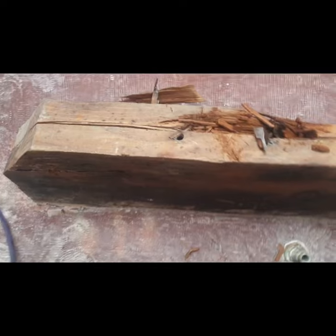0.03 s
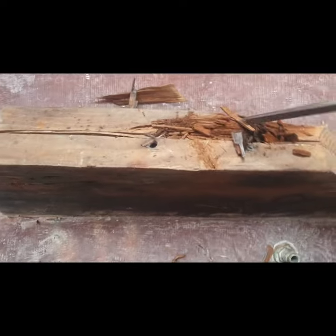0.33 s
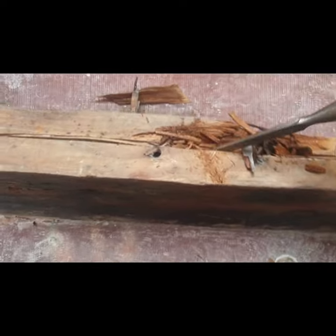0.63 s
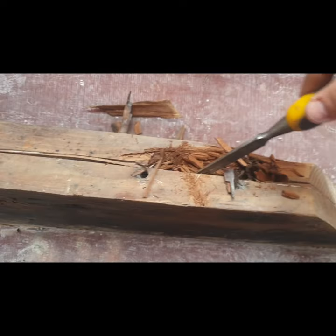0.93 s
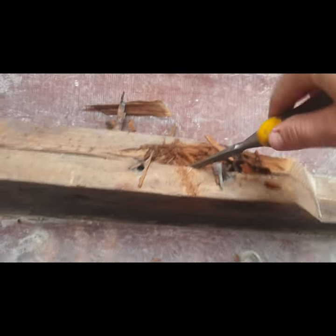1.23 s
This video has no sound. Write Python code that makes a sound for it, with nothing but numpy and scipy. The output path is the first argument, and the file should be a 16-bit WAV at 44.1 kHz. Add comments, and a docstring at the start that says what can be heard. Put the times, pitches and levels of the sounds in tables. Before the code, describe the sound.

Close to the microphone in a quiet small room, a chisel levers at decayed wood with light ticks, crumbly scrapes and occasional knocks. The crackling grows into a loud crack and a low workbench thud, then eases to faint scraping.

```python
"""Chisel in a rotten beam

A steel chisel picks and levers at a beam on a workbench, close to the microphone and a little to the
right, in a small room. Crumbling fibres rustle under the blade, dry splinters snap, the steel squeaks,
and the beam knocks on the booming bench. A run of sharp snaps ends in one loud break."""
import sys
import numpy as np
from scipy import signal
from scipy.fft import rfft, irfft, next_fast_len
from scipy.io import wavfile

SR = 44100
rng = np.random.default_rng(int(sys.argv[2]) if len(sys.argv) > 2 else 0)


def wav_record(signal):
    """Record a signal, one row per channel, as 16-bit PCM in the file named by sys.argv[1]."""
    frames = np.transpose(np.atleast_2d(signal))
    bounded = np.clip(frames, -1, 1)
    # unit amplitude maps onto the largest positive 16-bit level
    quanta = np.round(bounded * 32767).astype(np.int16)
    wavfile.write(sys.argv[1], SR, quanta)


N = 4 * SR
HIT_TIME = np.arange(SR * 3 // 5) / SR  # seconds into one hit
HIT_N = len(HIT_TIME)

# Splinters snapping: start_s, level_db, woody_db, top_db, left_minus_right_db
SPLINTERS = [(0.7325, -56, -6, -22, -9.5), (0.8705, -64, -11, -8, -9), (1.1425, -61.5, -2, -22, -5),
             (1.3004, -49, -2, -11, -4), (0.9259, -42, -3, -15.5, -8.5), (1.0138, -49, -2.5, -20, -7.5),
             (1.0557, -54, -15, -9, -6), (1.266, -46, -12, -10.5, -11.5), (1.3181, -41.5, 4, -6, -0.5),
             (1.3292, -27, -30, -13, -6), (1.3403, -37.5, 5, -13, -1), (1.476, -38.5, -7.5, -11, -3.5),
             (1.51, -39, -5.5, -14, -5), (1.5514, -46.5, -4, -11, 0), (1.5988, -34.5, -4.5, -15.5, -5.5),
             (1.6047, -35, 0, -24, -4), (1.7963, -36, -9, -11.5, -3), (1.8139, -32.5, -2.5, -15, -2),
             (1.9674, -26.5, -3, -15.5, -5), (2.1675, -45.5, -10, -2, -9.5), (2.1799, -32, -5, -28, 0),
             (2.5047, -42.5, -4.5, -11, -8), (2.6569, -40.5, -3.5, -7, -9), (2.7458, -41, -4, -13, -7),
             (2.819, -32.5, -10.5, -16, -5), (2.9438, -24.5, -7, -7, -7), (3.0053, -24.5, -11.5, -9, -2),
             (3.0415, -29.5, -8.5, -4, -2), (3.0782, -23, -1.5, -4, -4), (3.1487, -30, -17.5, -9.5, -6),
             (3.1643, -17, -10, -8.5, -3.5), (3.2299, -14.5, 1.5, -2, -4.5),
             (3.3491, -27.5, -5.5, -15.5, -5.5), (3.5106, -51, 0, 2, -1.5), (3.8497, -42, -8, -13, 0)]
# The woody, cracking and top bands of a snap: frequency_hz, gain_db
WOODY_BAND = [(100, -22), (310, -4), (520, -11.5), (820, -2), (1020, -9), (1420, 2), (1900, -5), (2400, -3),
              (3300, -10.5), (7000, -49.5)]
CRACK_BAND = [(1200, -37.5), (2700, -2.5), (4200, -0.5), (5800, -6), (7300, -5), (8600, -20.5),
              (12000, -31)]
TOP_BAND = [(5000, -38.5), (8300, -4), (10500, 0.5), (12000, -2.5), (14300, -1), (16000, -13.5)]
# Beam knocking on the bench: start_s, clack_db, hollow_db, boom_db, body_db, edge_hz, damping_factor
BEAM_KNOCKS = [(0.145, -80, -78, -59, -60.5, 1000, 1.14), (0.5, -86, -85, -67, -69, 800, 0.97),
               (0.7314, -40.5, -44.5, -40, -45, 1470, 0.92), (0.871, -64, -68, -64, -70, 1500, 0.91),
               (1.329, -30.5, -40.5, -44.5, -46, 3000, 0.88), (1.526, -50, -57, -48, -56.5, 2400, 0.75),
               (1.607, -34, -49.5, -41, -45, 2400, 1.34), (1.77, -16, -38, -30, -42, 2000, 0.99),
               (1.814, -42, -50, -41, -42, 2400, 1.37), (2.179, -35, -51, -37.5, -41, 2200, 1.1),
               (2.227, -46, -64, -36, -41.5, 1600, 1.45), (2.266, -44, -62, -33, -43, 1600, 2.04),
               (2.295, -63, -73, -40, -44, 1200, 2.6), (2.495, -41, -65, -40, -60.5, 1800, 1.34),
               (2.771, -43, -52, -34, -48.5, 1600, 1.34), (2.821, -36, -58, -35, -43.5, 2200, 1.75),
               (3.077, -21.5, -46, -58, -40.5, 2900, 1.2), (3.23, -8, -31.5, -27, -39, 2800, 1.3),
               (3.236, -6, -28, -15.5, -25, 2600, 1.33), (3.259, -17, -32.5, -19.5, -19, 2600, 1.94),
               (3.347, -22.5, -51, -22, -33, 1700, 1.38), (3.373, -41, -59, -25, -33, 1400, 1.8),
               (3.456, -40, -44, -38, -44, 1500, 0.97), (3.768, -40, -50, -38.5, -39, 1500, 1.23),
               (3.807, -36.5, -41.5, -46, -41.5, 2000, 1.2), (3.821, -42, -46.5, -46, -44.5, 2100, 1.15),
               (3.843, -38, -53, -45, -44, 2200, 1.23), (3.879, -47, -58, -41.5, -47, 1600, 1.38)]
# Modes of beam and bench, low to high: pitch_hz, level_db, t60_s
BOOM_MODES = [(62.9, -12, 0.48), (90.5, -8.5, 0.22), (109.2, 1.5, 0.38), (172.5, -13.5, 0.3)]
BODY_MODES = [(219.4, -5.5, 0.28), (318.3, -1.5, 0.24), (340.5, -2, 0.35), (412.6, -6, 0.23),
              (510.5, -9.5, 0.17), (571.4, -7, 0.22)]
HOLLOW_MODES = [(590, -11, 0.1596), (702, -11, .1), (800.8, 0.5, 0.16), (851.7, -3, .16), (933, -6.5, 0.14)]
CLACK_MODES = [(1072, -2.5, 0.14), (1180, -2.5, 0.1), (1369, 1.5, 0.096), (1419, 0, 0.1),
               (1652, -11.5, 0.1), (1940, -11.5, 0.052), (2315, -4, 0.15), (2370, -5.5, 0.14)]
# Contact noise and dull grind of beam on bench: frequency_hz, gain_db
CONTACT_SPECTRUM = [(100, -20), (300, -3.5), (550, -21.5), (750, -9.5), (1050, 1), (1400, -0.5), (1800, -6),
                    (2250, -2), (2900, -22), (8000, -37.5)]
GRIND_SPECTRUM = [(50, -5), (100, -0.5), (170, -0.5), (250, -2.5), (320, 2), (450, -10.5), (700, -21.5),
                  (2000, -60.5)]
# Strokes of the blade: peak_s, rise_s, fall_s, hiss_db, rasp_db
BLADE_STROKES = [(1.135, 0.053, 0.072, -73, -67), (1.305, 0.027, 0.035, -56.5, -54),
                 (1.39, 0.038, 0.14, -57, -56), (1.525, 0.033, 0.064, -52, -53.5),
                 (1.66, 0.042, 0.072, -67, -71), (1.829, 0.092, 0.11, -50, -60),
                 (2.025, 0.083, 0.11, -56.5, -58), (2.222, 0.055, 0.097, -52.5, -50),
                 (2.49, 0.081, 0.065, -52.5, -60.5), (2.633, .12, 0.1, -51.5, -54.5),
                 (2.811, 0.1, 0.076, -47.5, -48.5), (3.125, .03, .04, -51, -53),
                 (3.205, 0.096, 0.18, -38.5, -43.5), (3.589, 0.11, 0.076, -58, -61),
                 (3.845, 0.039, 0.042, -49.5, -47.5), (3.901, 0.053, 0.067, -58.5, -56)]
# Faint rustle between strokes: time_s, level_db
RUSTLE_LEVEL = [(0.7, -89), (0.95, -76), (1.25, -77.5), (1.45, -66.5), (2.1, -70.5), (2.38, -68),
                (2.73, -67.5), (2.9, -82), (3.5, -68), (4.0, -74.5)]
# Fraying hiss and woody rasp of the fibres: frequency_hz, gain_db
HISS_SPECTRUM = [(400, -36), (1000, -15), (2000, 2.5), (3620, 0.5), (4930, -2), (5800, -7), (7100, -3.5),
                 (8700, -12.5), (12800, -7.5), (14000, -8), (15000, -17.5)]
RASP_SPECTRUM = [(150, -30), (318, -3), (450, -4.5), (660, -14), (829, -3.5), (1150, -10.5), (1400, -0.5),
                 (1700, -8.5), (2200, -10), (3500, -29.5), (8000, -55)]
# Modes of the steel blade: pitch_hz, level_db, t60_s
BLADE_MODES = [(3504, 0, 0.036), (3450, -5, 0.017), (6440, -9.5, 0.027), (7040, -8.5, 0.027)]
# Steel dragging on wood: start_s, length_s, from_hz, to_hz, level_db
BLADE_SQUEAKS = [(2.356, 0.065, 1366, 1460, -66), (3.872, 0.0303, 1280, 1556, -49)]
# Course of the bench's rumble: time_s, level_db
RUMBLE_LEVEL = [(0.1, -61.5), (0.29, -74.5), (0.54, -87), (0.76, -72), (0.92, -67), (1.12, -69.5),
                (1.36, -73), (1.51, -62), (1.64, -70), (1.77, -72), (1.9, -59), (2.32, -58), (2.43, -59),
                (2.6, -49), (2.72, -56), (2.9, -55.5), (3.01, -60.5), (3.17, -57.5), (3.3, -36), (3.4, -42),
                (3.53, -47.5), (3.6, -62.5), (3.85, -59), (4.0, -62)]
# Bench rumble and room tone: frequency_hz, gain_db
RUMBLE_SPECTRUM = [(20, -28.5), (45, -1), (75, -12), (110, 3), (145, -12), (240, -19), (330, -14.5),
                   (480, -29.5), (800, -30.5), (2000, -49.5)]
ROOM_SPECTRUM = [(15, -39), (25, -9.5), (54, 0), (139, -13), (172, -14.5), (415, -33.5), (1500, -42),
                 (3930, -37), (5280, -42), (6200, -36), (15000, -52)]
# Decay of the small room: frequency_hz, t60_s
ROOM_DECAY = [(200, 0.45), (1500, 0.22), (6000, 0.22), (14000, 0.17)]
# Likeness of the microphone's two channels: frequency_hz, correlation
MIC_LIKENESS = [(100, 0.98), (300, 0.82), (700, 0.39), (1200, 0.033), (4000, 0.04), (14000, 0.043)]
# Balance at the microphone: frequency_hz, left_minus_right_db
MIC_BALANCE = [(60, -7.5), (500, -7), (1100, -4), (2000, 1), (4000, -6), (7000, -12.5), (9200, -2.5),
               (12000, -9.5), (15000, -10.5)]


def splinter_snaps():
    """Dry splinters break close up, each with its own mix of wood tone, crack and top."""
    woody, crack, top = np.zeros((3, 2, N))
    for start_s, db, woody_db, top_db, pan_db in SPLINTERS:
        snap = punch(fracture(t60_s=0.043, spike_db=-7, room_db=-4))
        snap *= amp(db - 8.5) * amp([[pan_db / 2], [-pan_db / 2]])
        add(woody, start_s, snap * amp(woody_db))
        add(crack, start_s, snap)
        add(top, start_s, snap * amp(top_db))
    return (amp(13.5) * colour(woody, WOODY_BAND) + amp(5.5) * colour(crack, CRACK_BAND)
            + amp(7) * colour(top, TOP_BAND))


def fracture(t60_s, spike_db, room_db):
    """Wood gives way: a spike, a ragged scatter of smaller breaks and the room's answer."""
    spike = punch(stereo_noise(HIT_N) * decay(0.00095))
    scatter = punch(stereo_noise(HIT_N) * decay(t60_s) * flicker(HIT_N, rate_hz=700, depth_db=4.5))
    tail = punch(room_tail() * flicker(HIT_N, rate_hz=220, depth_db=3.5))
    return amp(spike_db) * spike + scatter + amp(room_db) * tail


def beam_knocks():
    """The beam clacks at once; the bench's boom swells after it, damped by the hand's pressure."""
    out = np.zeros((2, N))
    for start_s, clack_db, hollow_db, boom_db, body_db, edge_hz, damping in BEAM_KNOCKS:
        boom = ring(BOOM_MODES, rise_s=0.014, scatter_db=0, damping=damping)
        body = ring(BODY_MODES, rise_s=0.0076, scatter_db=3, damping=damping)
        grind = stereo_noise(HIT_N) * decay(0.13) * (1 - decay(0.055))
        grind = punch(colour(grind, GRIND_SPECTRUM))
        hollow = punch(ring(HOLLOW_MODES, rise_s=0.0029, scatter_db=0.5))
        clack = punch(ring(CLACK_MODES, rise_s=0.0029, scatter_db=2.5))
        contact = punch(colour(fracture(t60_s=0.032, spike_db=-5.5, room_db=-8), CONTACT_SPECTRUM))
        treble_cut = [(edge_hz, 0), (edge_hz * 1.68, -25.5)]  # a soft contact is duller
        attack = colour(amp(-14) * clack + amp(-12) * contact, treble_cut)
        add(out, start_s, amp(boom_db + 5) * boom)
        add(out, start_s, amp(body_db) * (amp(-2) * body + amp(-4) * grind))
        add(out, start_s, amp(hollow_db - 1) * hollow + amp(clack_db) * attack)
    return out


def ring(modes, rise_s, scatter_db, damping=1):
    """Damped modes swell in; the higher ones reach the two channels out of step."""
    out = np.zeros((2, HIT_N))
    for hz, db, t60_s in modes:
        strength, phase, side, detune = rng.standard_normal(4)
        hz *= 1 + 0.012 * detune  # pitch varies from hit to hit
        spread = np.sign(side) * stereo_angle(hz) * np.array([[1], [-1]])
        tone = np.sin(2 * np.pi * hz * HIT_TIME + np.pi * phase + spread)
        out += amp(db + scatter_db * strength) * decay(t60_s / damping) * tone
    return out * (1 - np.exp(-(HIT_TIME / rise_s) ** 2))


def blade_scrape():
    """Each stroke swells and dies away, with its own share of hiss and woody rasp."""
    t = np.arange(N) / SR
    hiss_power = rasp_power = gain_curve(RUSTLE_LEVEL) ** 2
    for peak_s, rise_s, fall_s, hiss_db, rasp_db in BLADE_STROKES:
        swell_db = -20.5 * np.maximum((peak_s - t) / rise_s, (t - peak_s) / fall_s)
        hiss_power = hiss_power + amp(hiss_db + swell_db) ** 2
        rasp_power = rasp_power + amp(rasp_db + swell_db) ** 2
    return np.sqrt(hiss_power) * crumble(HISS_SPECTRUM) + np.sqrt(rasp_power) * crumble(RASP_SPECTRUM)


def crumble(spectrum, breaks_per_s=950):
    """Tiny fibres break in clumps over a soft rub."""
    breaking = rng.random(N) < breaks_per_s / SR
    strength = amp(6.5 * np.minimum(rng.standard_normal(N), 2))
    breaks = breaking * strength * rng.choice([-1, 1], N)
    grain = fracture(t60_s=0.0089, spike_db=-0.5, room_db=-5)
    grains = signal.fftconvolve(breaks[None], grain, axes=1)[:, :N]
    texture = unit(colour(grains, spectrum)) + steady_noise(spectrum)
    return amp(-1.5) * texture * flicker(N, rate_hz=66, depth_db=1.9)


def blade_ping(start_s=3.0055):
    """The blade slips off a hard spot and the steel rings, short and bright."""
    out = np.zeros((2, N))
    tone = ring(BLADE_MODES, rise_s=0.0003, scatter_db=1)
    reverb = signal.fftconvolve(tone, room_tail(), axes=1)[:, :HIT_N]
    add(out, start_s, amp(-21.5) * (tone + amp(-37.5) * reverb))
    return out


def blade_squeaks():
    """The dragged blade squeaks briefly, rising in pitch."""
    out = np.zeros((2, N))
    for start_s, length_s, from_hz, to_hz, db in BLADE_SQUEAKS:
        progress = np.linspace(0, 1, round(length_s * SR))
        pitch_hz = from_hz + (to_hz - from_hz) * progress
        tone = np.sin(2 * np.pi * np.cumsum(pitch_hz) / SR)
        envelope = np.sin(np.pi * progress) * flicker(len(tone), rate_hz=287, depth_db=5.5)
        add(out, start_s, amp(db) * unit(tone * envelope))
    return out


def bench_rumble():
    """The beam shifts under the hand's pressure and the bench rumbles."""
    return amp(2.5) * gain_curve(RUMBLE_LEVEL) * steady_noise(RUMBLE_SPECTRUM)


def room_tail():
    """The small room answers a hit; the treble dies first."""
    hz, t, bands = signal.stft(stereo_noise(HIT_N), SR, nperseg=256)
    bands *= np.exp(-np.log(1000) * t / along(ROOM_DECAY, hz)[:, None])
    tail = signal.istft(bands, SR)[1][:, :HIT_N]
    return punch(tail * (1 - decay(0.019)))


def room_tone():
    """Faint, low air behind the work."""
    return amp(-67) * steady_noise(ROOM_SPECTRUM)


def amp(db):
    """Decibels to gain."""
    return 10 ** (np.asarray(db) / 20)


def unit(x):
    """Scale to rms 1."""
    return x / np.sqrt(np.mean(x ** 2) + 1e-20)


def punch(x):
    """Scale to the energy of 20 ms at rms 1."""
    return x / np.sqrt(np.mean(np.sum(x ** 2, axis=-1)) / (SR * 0.02) + 1e-20)


def along(points, hz):
    """Read (frequency_hz, value) points on a log axis."""
    point_hz, values = np.transpose(points)
    return np.interp(np.log(hz + 1), np.log(point_hz + 1), values)


def gain_curve(points):
    """A (time_s, level_db) curve as a gain per sample."""
    return amp(np.interp(np.arange(N) / SR, *np.transpose(points)))


def decay(t60_s):
    """Exponential decay over the length of a hit."""
    return np.exp(-np.log(1000) * HIT_TIME / t60_s)


def flicker(size, rate_hz, depth_db):
    """An uneven gain that moves between random levels."""
    position = np.arange(size) * rate_hz / SR
    knots = np.clip(rng.standard_normal(size // 8), -2, 2)
    return amp(depth_db * np.interp(position, np.arange(len(knots)), knots))


def add(track, start_s, sound):
    """Mix a sound in at start_s."""
    i = round(start_s * SR)
    track[:, i:i + sound.shape[-1]] += sound[..., :N - i]


def colour(x, spectrum):
    """Minimum-phase filter with a (frequency_hz, gain_db) shape."""
    size = 2 * next_fast_len(x.shape[-1] // 2 + 2048)
    gain = amp(along(spectrum, np.fft.rfftfreq(size, 1 / SR)))
    cepstrum = irfft(np.log(gain))
    cepstrum[1:size // 2] *= 2
    cepstrum[size // 2 + 1:] = 0
    return irfft(rfft(x, size) * np.exp(rfft(cepstrum)), size)[..., :x.shape[-1]]


def stereo_angle(hz):
    """Half the phase angle between the channels, in radians."""
    return np.arccos(np.clip(along(MIC_LIKENESS, hz), -1, 1)) / 2


def stereo_noise(size):
    """Noise with channels alike in the bass and unrelated in the treble."""
    mid, side = rfft(rng.standard_normal((2, size)))
    angle = stereo_angle(np.fft.rfftfreq(size, 1 / SR))
    mid, side = mid * np.cos(angle), side * np.sin(angle)
    return irfft(np.array([mid + side, mid - side]), size)


def steady_noise(spectrum):
    """Coloured stereo noise at rms 1."""
    return unit(colour(stereo_noise(N), spectrum))


def scene():
    """The work lies close to the microphone, right of centre."""
    work = beam_knocks() + blade_ping() + blade_squeaks() + blade_scrape() + bench_rumble() + room_tone()
    left = colour(work[0], [(hz, db / 2) for hz, db in MIC_BALANCE])
    right = colour(work[1], [(hz, -db / 2) for hz, db in MIC_BALANCE])
    return np.array([left, right]) + splinter_snaps()


def record(dry, open_s=0.11, top_hz=15838):
    """The recorder opens after a moment, rounds the highest peaks and cuts the top."""
    opened = dry * np.clip((np.arange(N) / SR - open_s) / 0.01, 0, 1)
    rounded = opened / (1 + np.abs(opened) ** 6) ** (1 / 6)
    hz = np.fft.rfftfreq(N, 1 / SR)
    rolloff = amp(np.interp(hz, [14600, 15000, top_hz], [0, -24, -36])) * (hz < top_hz)
    return irfft(rfft(rounded) * rolloff, N)


dry = scene()
out = record(dry)
wav_record(out)
```